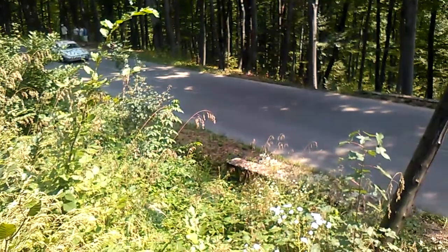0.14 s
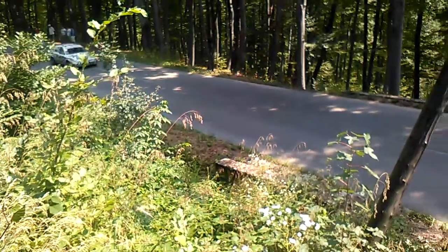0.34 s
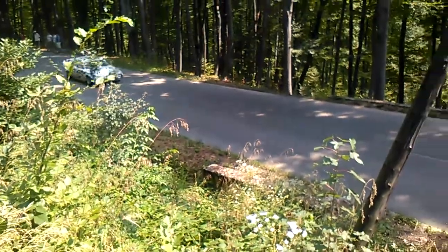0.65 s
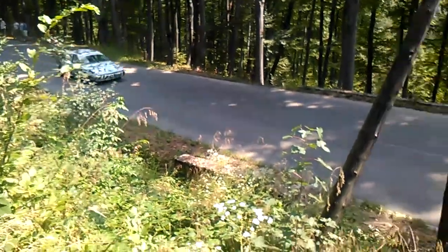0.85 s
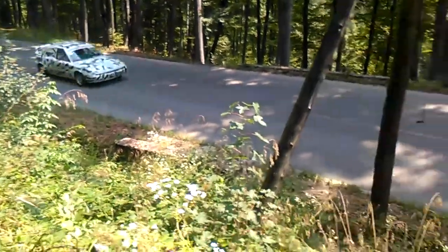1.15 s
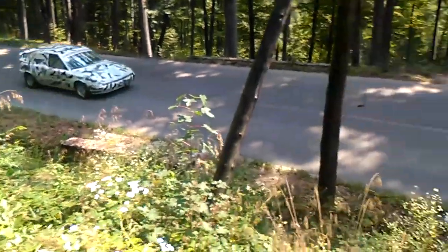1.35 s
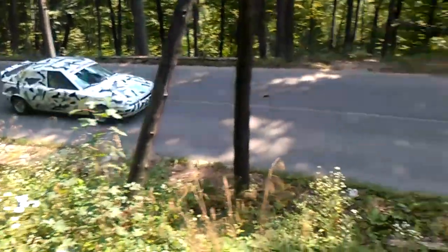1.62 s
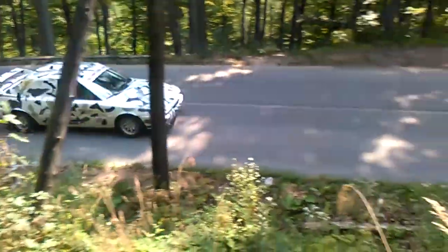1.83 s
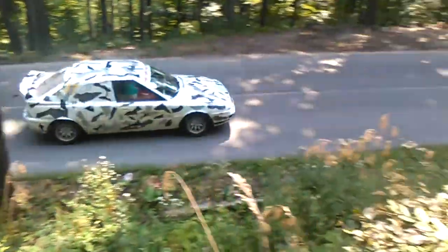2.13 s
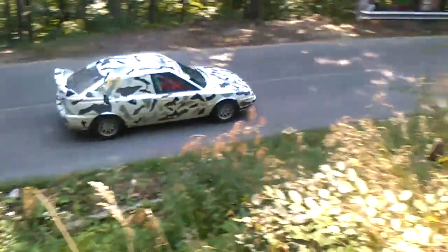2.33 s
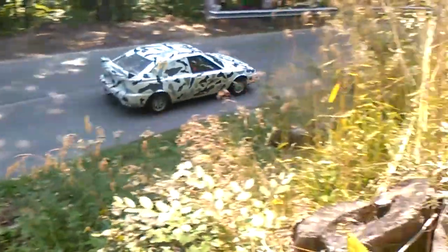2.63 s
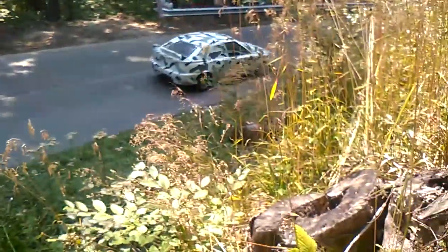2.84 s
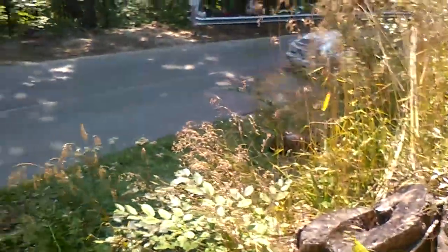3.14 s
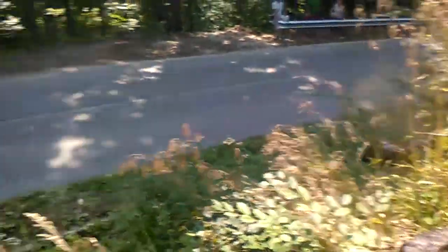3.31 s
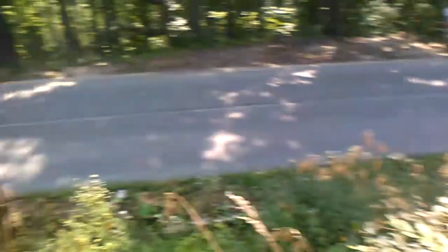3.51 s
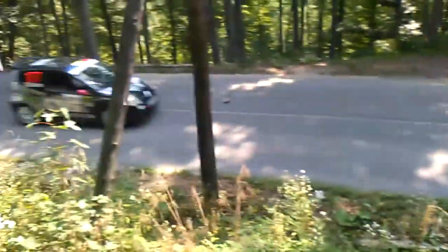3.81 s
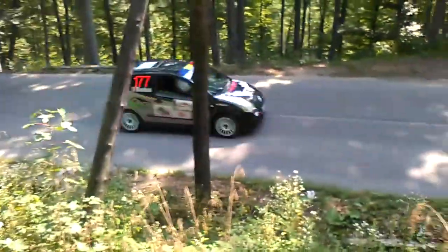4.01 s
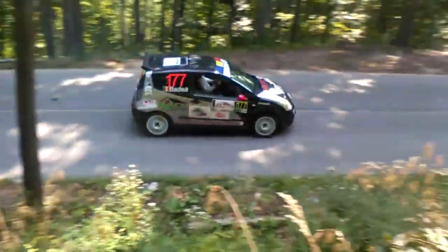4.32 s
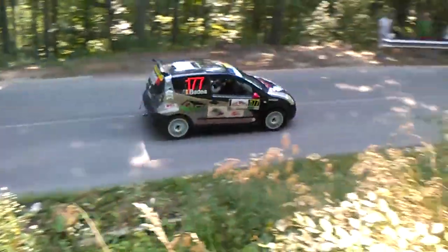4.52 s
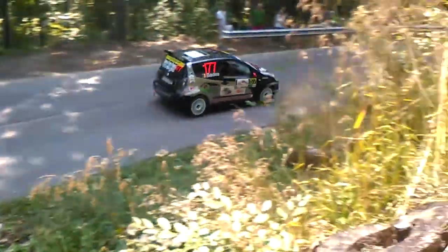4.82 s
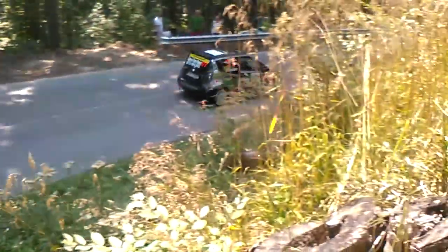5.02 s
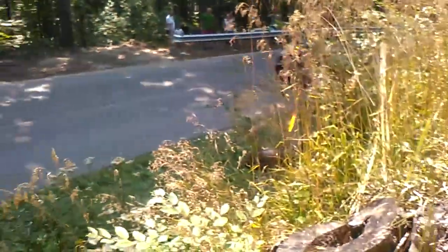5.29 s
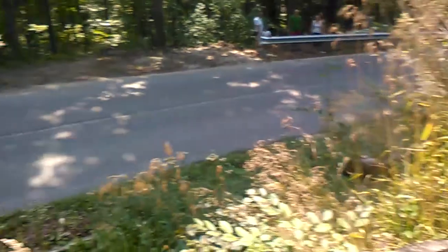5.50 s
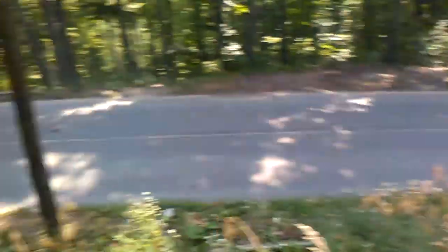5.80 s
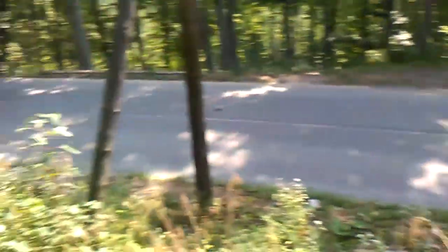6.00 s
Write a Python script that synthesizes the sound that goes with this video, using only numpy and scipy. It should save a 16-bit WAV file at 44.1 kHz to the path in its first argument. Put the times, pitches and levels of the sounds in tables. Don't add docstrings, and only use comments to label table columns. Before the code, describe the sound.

Outdoors beside a forest road, slowed down so everything is deep and dull. A faint drone and falling exhaust note approach, then the first car sweeps past with a muffled roar, tyre rush and heavy low bumps. A second, louder car follows with a rough, uneven engine, then recedes as the tyre rush and scrub grow.

```python
import sys
import numpy as np
from scipy import signal
from scipy.fft import rfft, irfft, next_fast_len
from scipy.io import wavfile
from scipy.ndimage import uniform_filter1d

SR = 44100
rng = np.random.default_rng(int(sys.argv[2]) if len(sys.argv) > 2 else 0)


def gain_from_db(level_db):
    decades = np.asarray(level_db, float) / 20
    return 10 ** decades


def wrap_up_sound(samples):
    columns = np.atleast_2d(samples).T
    tamed = np.clip(columns, -1, 1)
    steps = np.round(tamed * 32767).astype(np.int16)
    wavfile.write(sys.argv[1], SR, steps)


N = 271215
T = np.arange(N) / SR


def evened(x):
    return x / np.sqrt(np.mean(abs(x) ** 2) + 1e-20)


def read(points, hz):
    f, value = np.transpose(points)
    return np.interp(np.log(hz + 1), np.log(f + 1), value)


def columns(rows, t, fade=0.026):
    s, *cols = np.transpose(rows)
    inside = np.minimum(t - s[0], s[-1] - t)
    gate = np.clip((inside + fade / 2) / fade, 0, 1)
    return gate, [np.interp(t, s, c) for c in cols]


def bell(hz, centre, width):
    return np.exp(-.5 * ((hz - centre) / (width / 2)) ** 2)


def drift(hz):
    size = next_fast_len(N)
    f = np.fft.rfftfreq(size, 1 / SR)
    slowed = rfft(rng.standard_normal(size)) / (1 + (f / hz) ** 4)
    return evened(irfft(slowed, size)[:N])


def resonate(x, hz, width):
    turn = np.exp(2j * np.pi * np.cumsum(hz) / SR)
    r = np.exp(-np.pi * width / SR)
    low = x / turn
    for _ in range(2):
        low = signal.lfilter([1 - r], [1, -r], low)
    return evened((turn * low).real)


def note(rows, wobble_db, wander):
    gate, (hz, db) = columns(rows, T)
    turns = np.cumsum(hz * (1 + wander * drift(11.9))) / SR
    level_db = db + wobble_db * drift(20)
    return gate * gain_from_db(level_db) * np.sqrt(2) * np.cos(2 * np.pi * turns)


# start_s, pitch_hz, level_db
DRONE = [(0.0, 148.6, -51), (0.2, 150.5, -61), (0.77, 146.3, -59), (1.78, 137.6, -63), (2.03, 139.8, -51.5),
         (2.15, 134, -51)]
HUM = [(0, 182, -56), (.4, 176, -66), (.9, 178.4, -59.5), (1.7, 172.2, -61)]
WHINE = [(0.0, 345.2, -74.5), (0.37, 362.4, -68.5), (0.576, 356.3, -68), (1.022, 354.5, -69),
         (1.1, 360, -83)]
SQUEAK = [(1.95, 2319, -66), (2.17, 2202, -62), (2.24, 2069, -70)]


def drone_and_whine():
    far_tones = note(DRONE, 2.2, 0.0217) + note(HUM, 2.1, .008)
    return far_tones + note(WHINE, 3.7, 0.0092) + gain_from_db(1.5) * note(SQUEAK, 1.2, .0015)


# start_s, level_db, pitch_hz, decay_s (to -60 dB)
GRIT_TICKS = [
    (3.8074, -47, 13550, .01),
    (3.811, -64, 13360, .07),
    (4.066, -62, 13200, 0.043),
    (4.17, -67.5, 12700, .04),
    (5.049, -57, 8900, .02),
    (5.8496, -57, 12800, .08),
]


def ticks():
    out = np.zeros(N)
    t = np.arange(2000) / SR
    for s, db, hz, t60 in GRIT_TICKS:
        band = signal.butter(3, [.94 * hz, 1.07 * hz], "band", fs=SR, output="sos")
        strike = rng.standard_normal(2000) * gain_from_db(-60 * t / max(t60, .004))
        burst = signal.sosfilt(band, strike)
        out[round(s * SR):][:2000] += gain_from_db(db) * burst / abs(burst).max()
    return out


# time_s, level_db
ENGINE_LEVEL = [(0.0, -60.5), (0.43, -59.5), (0.45, -57.5), (2.14, -51.5), (2.4, -40), (2.57, -41),
                (2.59, -36.5), (2.94, -41.5), (3.96, -39.5), (4.15, -44), (4.16, -38.5), (4.35, -39),
                (4.44, -32), (4.73, -34.5), (4.88, -32.5), (4.92, -33), (5.82, -39.5), (6.15, -40)]
# time_s, level_db
TYRE_LEVEL = [(0.0, -61), (0.03, -63), (1.37, -53), (2.23, -54), (2.38, -46), (3.48, -47.5), (3.51, -45),
              (3.8, -44), (3.92, -50), (4.16, -54), (4.35, -48.5), (4.45, -40.5), (4.68, -38.5),
              (4.79, -32.5), (5.16, -33), (5.57, -33), (5.93, -29), (6.15, -29.5)]
# time_s, level_db
AIR_LEVEL = [(0, -86.5), (.22, -85.5), (.5, -86.5), (.95, -86.5), (1.15, -89.5), (2.25, -86.5), (2.38, -83),
             (2.75, -81.5), (2.9, -85.5), (3.55, -84), (3.8, -79), (3.9, -82.5), (4.35, -81.5),
             (4.47, -79.5), (5.03, -74), (5.33, -79), (5.85, -78), (6.15, -81.5)]
USUAL_DB = -45, -55, -84


def nearness(t):
    curves = ENGINE_LEVEL, TYRE_LEVEL, AIR_LEVEL
    return [columns(rows, t)[1][0] - usual_db for rows, usual_db in zip(curves, USUAL_DB)]


# peak_s, peak_db, length_s
HEAVES = [(0.204, -43, 0.41), (0.516, -41, 0.069), (0.744, -38.5, 0.18), (1.45, -42.5, 0.37),
          (2.043, -39.5, .2), (2.318, -32, 0.17), (2.525, -26.5, 0.11), (2.663, -40, 0.13),
          (2.87, -32.5, 0.13), (3.192, -39.5, .12), (3.396, -26, .09), (3.56, -37, 0.15),
          (4.035, -27, 0.092), (4.181, -32.5, 0.12), (4.298, -20, 0.15), (4.42, -20, 0.072),
          (4.58, -22.5, 0.22), (4.743, -22, 0.14), (5.2, -29.5, 0.92), (5.6, -32, 0.31), (6.004, -35, .25)]


def rumble():
    engine_db = nearness(T)[0]
    power = gain_from_db(-43.5 + 0.27 * engine_db) ** 2
    for s, db, length in HEAVES:
        power = power + gain_from_db(db) ** 2 * np.exp(-(2.8 * (T - s) / length) ** 2)
    body = resonate(rng.standard_normal(N), np.full(N, 65.0), 42.5)
    return gain_from_db(-3.5) * np.sqrt(power) * body


# time_s, peak_spacing_hz, depth_db
BOUNCE = [(0, 624, 3.5), (1, 585, 4), (2.15, 586, 2), (2.35, 580, 0.2), (3.85, 565, 0.1), (4.1, 597, 1),
          (4.7, 547, 0), (5.3, 560, 1.5), (6.15, 587, 0.5)]
# start_s, length_s, from_hz, to_hz, level_db
ECHOES = [(0, 0.23, 210, 178, 2.5), (.01, 0.71, 1060, 900, -6), (.1, 0.65, 2900, 2920, 3.5),
          (0.454, 0.29, 786, 767, 3), (1.4, 0.62, 2830, 2700, 3.5), (1.75, 0.42, 5000, 5250, 5),
          (1.805, 0.52, 280, 350, 5), (2.52, 0.15, 445, 455, 3), (2.6, 0.21, 3000, 2920, 4.5),
          (2.68, .12, 12800, 12800, 5), (3.0, .42, 2500, 2680, 3), (3.3, 0.39, 2040, 1100, 6),
          (3.45, 0.34, 2560, 1500, 4), (3.5, 0.21, 199, 220, 1.5), (3.614, 0.49, 760, 800, 5),
          (3.901, .5, 1800, 2100, 0), (4, .6, 2540, 2395, 6.5), (4.293, 0.37, 373, 343, 6.5),
          (4.365, 0.706, 1285, 1239, 6.5), (4.38, .7, 199, 188, -6), (4.397, .4, 13200, 13400, 3),
          (4.896, 0.46, 800, 930, -5.5), (5.1, .45, 5003, 5200, 6.5), (5.975, 0.16, 2350, 2044, 6)]


def echoes(hz, t):
    hz = hz[:, None]
    spacing_hz, depth_db = columns(BOUNCE, t)[1]
    comb = np.cos(2 * np.pi * (hz / spacing_hz - 0.26))
    field_db = depth_db * comb * np.exp(-(hz / 3000) ** 2)
    for s, length, hz0, hz1, db in ECHOES:
        gate, (centre,) = columns([(s, hz0), (s + length, hz1)], t, fade=0.085)
        field_db += db * gate * bell(hz, centre, 72 + 0.085 * centre)
    return field_db


# pitch_hz, density_db (per Hz)
FAR_COLOUR = [(200, -7), (280, -9.5), (450, -3), (700, -5.5), (1200, -13), (2600, -19), (3100, -29.5),
              (4200, -32)]
FIRST_COLOUR = [(200, 3.5), (290, -8), (380, -9.5), (650, -17), (1000, -21.5), (2330, -23), (3500, -32),
                (4200, -48)]
SECOND_COLOUR = [(200, 0), (255, -3), (330, -7), (600, -1.5), (1000, -19.5), (2640, -15), (3300, -22),
                 (4200, -32.5)]
COLOUR_HZ = 200, 4200
# pitch_hz, density_db (per Hz)
TREBLE = [(4200, -10), (5000, -9), (6200, -13.5), (7100, -21.5), (10000, -25.5), (13500, -24.5),
          (15000, -25.5)]
# pitch_hz, width_hz, level_db
STANDING_BANDS = [
    [(177, 24, 4), (800, 90, 0), (890, 110, -5.5), (1500, 140, 7), (2350, 200, -0.5), (4220, 600, 1)],
    [(280, 37, 4.5), (397, 105, -4.5), (487, 46, 0.5), (2270, 400, 1), (4000, 400, 3), (6200, 900, -2.5)],
    [(195, 44, -4.5), (264, 60, 2.5), (290, 40, -3.5), (402, 57, -4.5), (760, 62, 6.5), (900, 80, -1),
     (2800, 250, 2.5), (4460, 690, -6)],
]
# time_s, colour_number (0 far, 1 first, 2 second; on to 3 it flattens)
HANDOVER = [(0, 0.5), (2.15, 0.3), (2.35, 0.76), (3.9, 1), (4.4, 3), (6.15, 1.9)]
EDGES_HZ = [112, 170, 380, 900, 1700, 3200, 4600, 7000, 10500, 16000]
# usual_db, engine_share, tyre_share, air_share, far_extra_db
LAYERS = [
    (-54.5, 0.84, -0.28, 0.079, -4),
    (-46, 1.134, -0.064, 0, -2),
    (-51.5, 0.72, 0.3, 0, 0.5),
    (-56.5, 0.38, .65, 0.043, 0),
    (-59.5, -0.33, 1.073, 0.57, 0),
    (-73.5, 0.092, 1.024, 0.41, -7),
    (-81, 0.065, 0.47, 0.77, -0.5),
    (-84.5, 0.014, 0.1, 0.93, 0.5),
    (-81.5, 0.35, -0.13, .9, 2),
]


def roar_and_rush():
    frames, hz = N // 256 + 5, np.fft.rfftfreq(1024, 1 / SR)
    t = np.arange(frames) * 256 / SR

    which = columns(HANDOVER, t)[1][0]
    shape = np.zeros((len(hz), frames))
    for k, points in enumerate((FAR_COLOUR, FIRST_COLOUR, SECOND_COLOUR)):
        colour = read(points, np.clip(hz, *COLOUR_HZ)) + read(TREBLE, hz)
        for centre, width, db in STANDING_BANDS[k]:
            colour = colour + db * bell(hz, centre, width)
        shape += colour[:, None] * np.clip(1 - abs(which - k), 0, 1)

    engine_db, tyres_db, air_db = nearness(t)
    far = np.clip(1 - which, 0, 1)
    lift_db = np.full(shape.shape, -60.0)
    for lo, hi, layer in zip(EDGES_HZ, EDGES_HZ[1:], LAYERS):
        usual_db, engine, tyres, air, far_db = layer
        level_db = usual_db + engine * engine_db + tyres * tyres_db + air * air_db + far_db * far
        band = (hz >= lo) & (hz < hi)
        lift_db[band] = level_db - 10 * np.log10((gain_from_db(shape[band]) ** 2).sum(0))
    lift_db[3:] = uniform_filter1d(lift_db[3:], size=3, axis=0)
    lift_db[30:] = uniform_filter1d(lift_db[30:], size=21, axis=0)

    a, b, patches = rng.standard_normal((frames, 513, 3)).T
    patches = uniform_filter1d(patches, size=7, axis=0)
    patches = evened(uniform_filter1d(patches, size=12, axis=1))
    flicker = evened(uniform_filter1d(rng.standard_normal(frames), size=2))
    gusty_db = np.interp(hz, [500, 3000, 12000], [.3, .8, 1.5])[:, None]
    motion_db = echoes(hz, t) + 0.65 * patches + gusty_db * flicker
    z = (a + 1j * b) * gain_from_db(shape + lift_db + motion_db)
    return gain_from_db(0.86) * signal.istft(z, nperseg=1024, noverlap=768)[1][:N]


# time_s, pitch_hz, level_db
SCRUB = [(5.2, 2463, -48), (5.438, 2490, -39.5), (5.948, 2720, -32), (6.06, 2184, -36), (6.15, 2270, -36)]


def scrub():
    gate, (hz, db) = columns(SCRUB, T, fade=0.14)
    lumps = gate * gain_from_db(db + 1.57 * drift(60))
    slip = lumps * resonate(rng.standard_normal(N), hz, 760.0)
    treble_cut = signal.butter(6, 3400.0, fs=SR, output="sos")
    return signal.sosfilt(treble_cut, slip)


# time_s, pitch_hz, level_db
BRAKING = [(0.0, 80, -46.5), (0.162, 71.4, -36), (0.266, 69.3, -36), (0.43, 68.2, -40), (0.62, 66.5, -40),
           (0.74, 61.26, -31.5), (0.894, 54.2, -34.5), (1.068, 44, -37), (1.2, 39.4, -63)]
COASTING = [(1.02, 77.6, -50), (1.14, 72.8, -46.5), (1.246, 68.9, -39.5), (1.45, 70.2, -55),
            (1.7, 65.7, -52)]
PULLING = [(2.22, 142.9, -42), (2.36, 144.3, -43.5), (2.718, 154.0, -38.5), (3.106, 159.6, -41.5),
           (3.352, 162.4, -44), (3.51, 157.4, -45), (3.66, 140.5, -46), (3.75, 137.4, -44)]
CLIMBING = [(4.05, 145.8, -55.5), (5.192, 160.7, -47.5), (5.402, 155.3, -50), (5.57, 159.5, -39),
            (5.714, 167, -45.5), (5.85, 154.3, -46.5)]
LIFTING = [(5.0, 81.7, -36.5), (5.25, 68.1, -32), (5.348, 64.3, -29.5), (5.47, 56.7, -55)]


def exhaust_notes():
    slowing = note(BRAKING, 0.63, 0.0072) + note(COASTING, 1.0, 0.014) + note(LIFTING, 0.98, 0.004)
    return slowing + note(PULLING, 1.2, .005) + note(CLIMBING, 1.5, .006)


# time_s, firing_hz, firing_db, uneven_db (common level to which each uneven order adds its own)
SECOND_ENGINE = [(3.0, 108.4, -50, -49.5), (3.39, 108.9, -45, -50), (3.49, 109.2, -54, -48.5),
                 (3.84, 106.4, -38, -57), (4.06, 109.3, -43, -54), (4.29, 104.5, -28, -45.5),
                 (4.44, 104.4, -34, -37), (4.6, 102.7, -27.5, -44), (4.76, 101.6, -27.5, -39.5),
                 (4.83, 102.5, -38, -33.5), (4.89, 101.4, -31, -33), (5.09, 100, -35.5, -39),
                 (5.7, 98.16, -39, -48.5), (6.15, 95.7, -46, -44)]
# multiple_of_firing, level_db
UNEVEN = [(.5, -3), (1.5, -8), (2, -5.5), (2.5, -3), (5, -10)]


def second_engine():
    gate, (hz, db, uneven_db) = columns(SECOND_ENGINE, T)
    turn = 2 * np.pi * np.cumsum(hz * (1 + 0.0061 * drift(12))) / SR
    out = gain_from_db(db + 3.0 * drift(28)) * np.cos(turn)
    for multiple, order_db in UNEVEN:
        level_db = uneven_db + order_db + 3.04 * drift(10)
        out += gain_from_db(level_db) * np.cos(multiple * turn + 0.59 * drift(7.3))
    return gate * np.sqrt(2) * out


def scene():
    background = drone_and_whine() + ticks() + rumble()
    passing = roar_and_rush() + scrub()
    engines = exhaust_notes() + second_engine()
    return (background + passing + engines)[None]


def top_cut(x):
    return signal.sosfilt(signal.butter(12, 14290, fs=SR, output="sos"), x)


def record(dry):
    bass_cut = signal.butter(6, 46.0, "high", fs=SR, output="sos")
    mix = signal.sosfilt(bass_cut, dry)
    return top_cut(mix)


dry = scene()
out = record(dry)
wrap_up_sound(out)
```